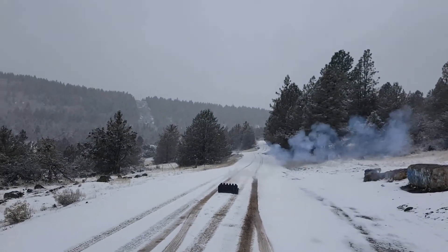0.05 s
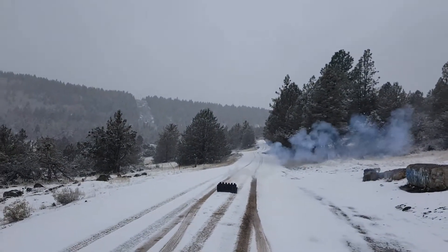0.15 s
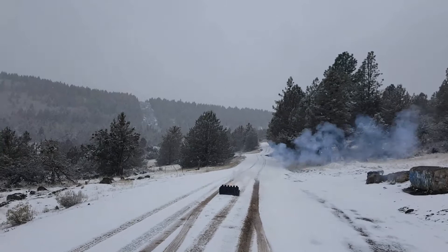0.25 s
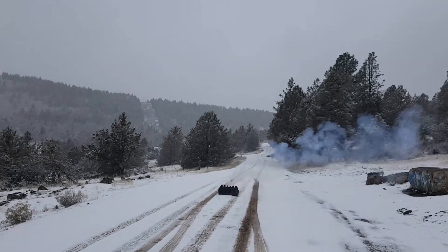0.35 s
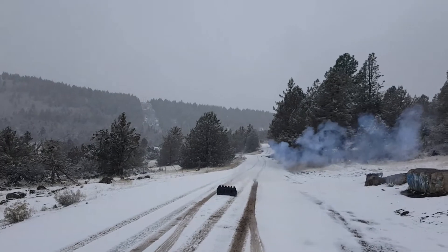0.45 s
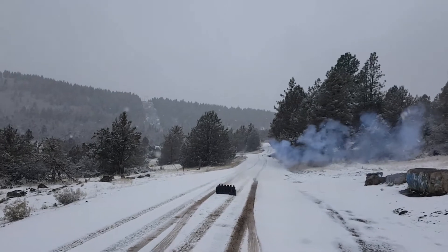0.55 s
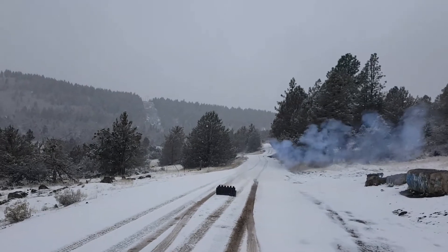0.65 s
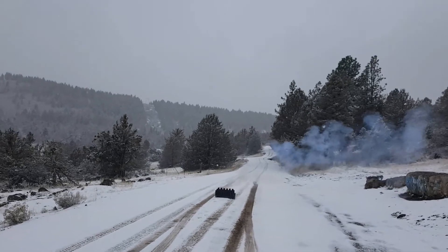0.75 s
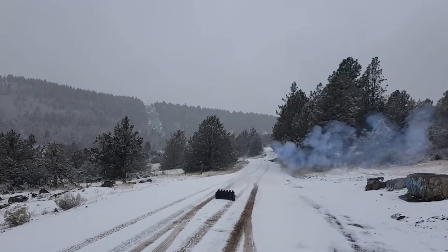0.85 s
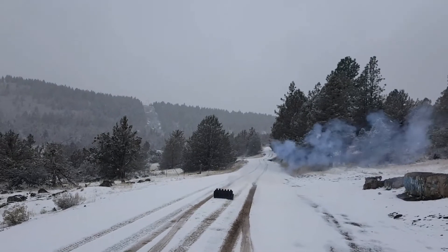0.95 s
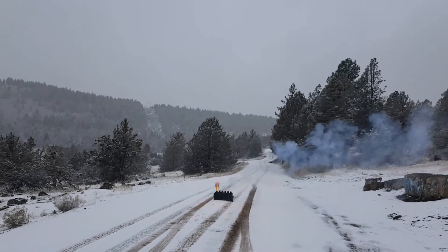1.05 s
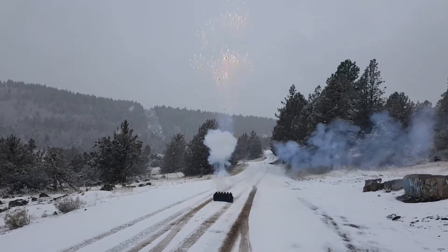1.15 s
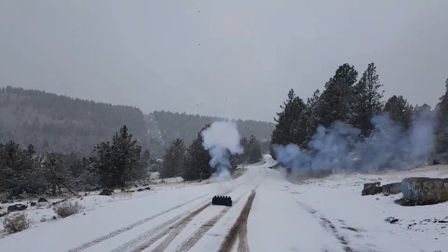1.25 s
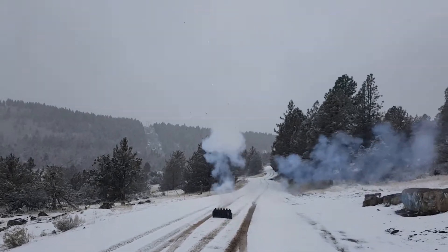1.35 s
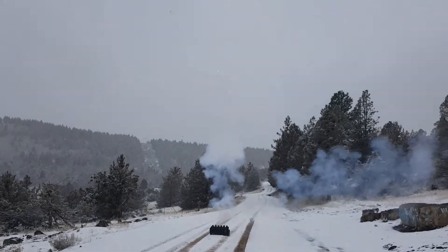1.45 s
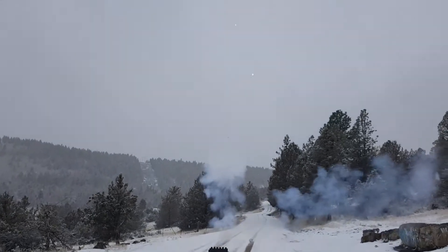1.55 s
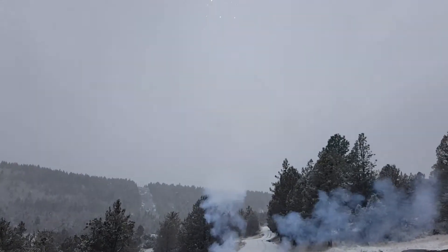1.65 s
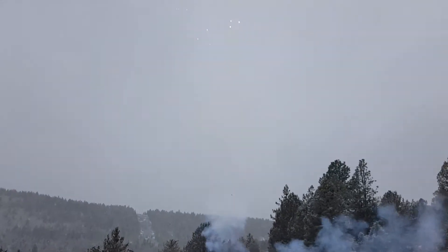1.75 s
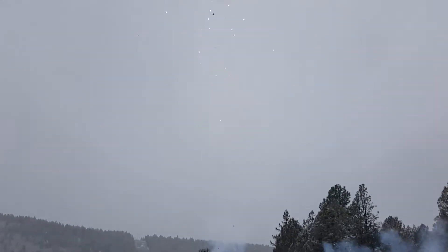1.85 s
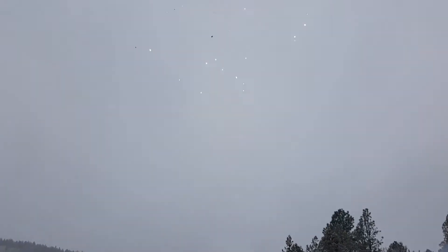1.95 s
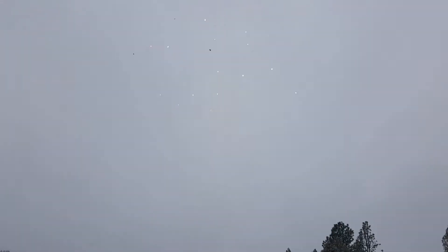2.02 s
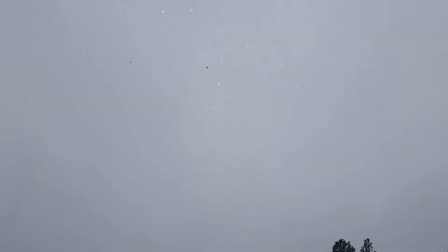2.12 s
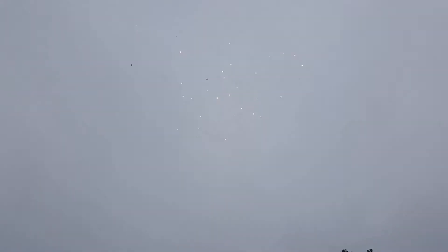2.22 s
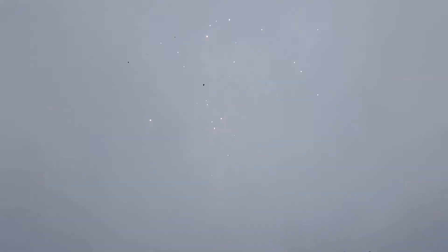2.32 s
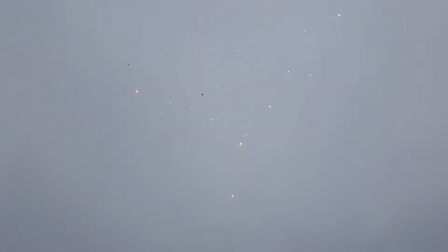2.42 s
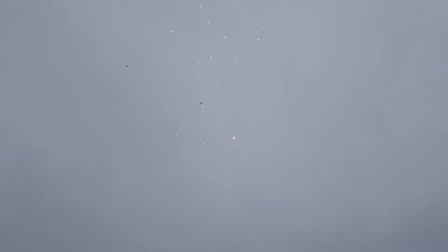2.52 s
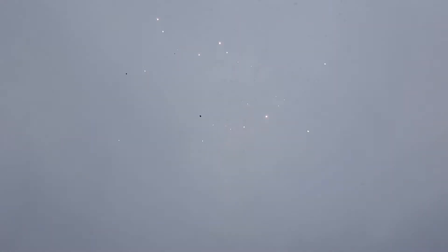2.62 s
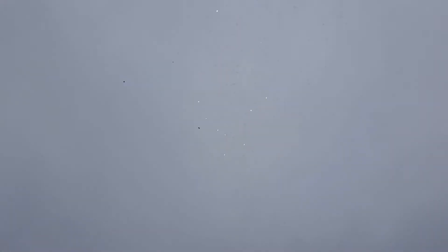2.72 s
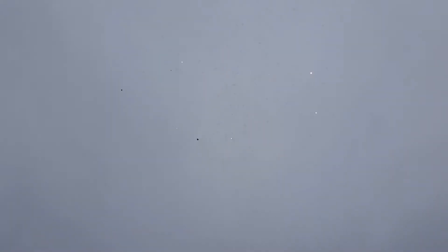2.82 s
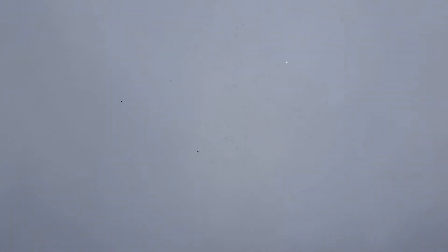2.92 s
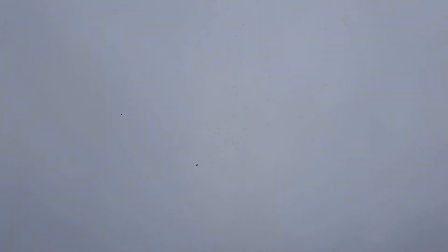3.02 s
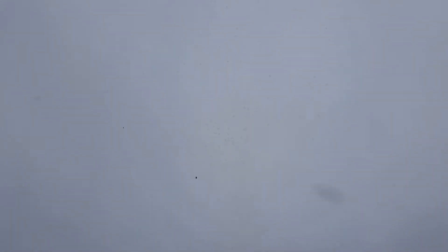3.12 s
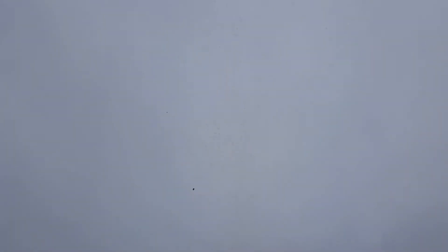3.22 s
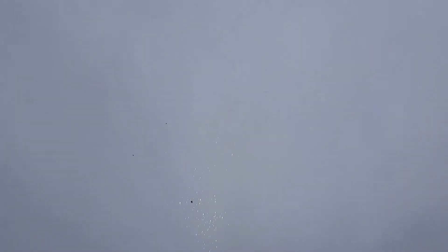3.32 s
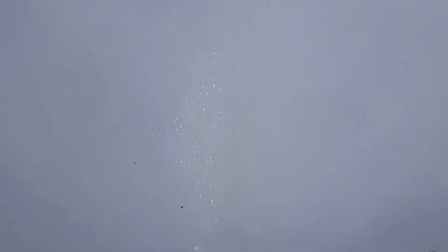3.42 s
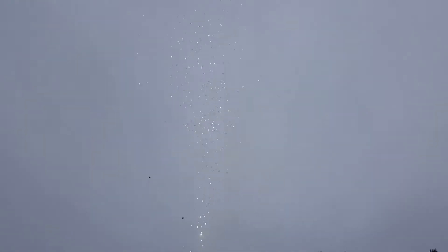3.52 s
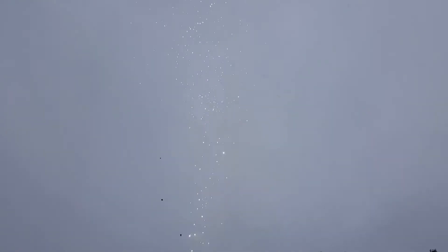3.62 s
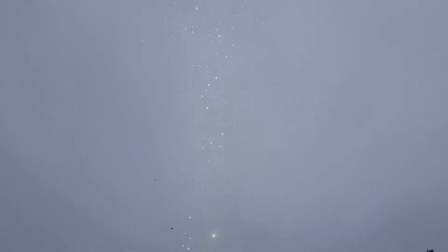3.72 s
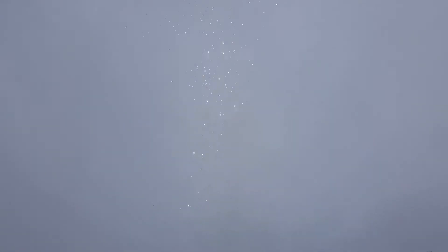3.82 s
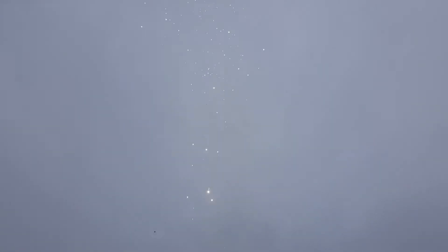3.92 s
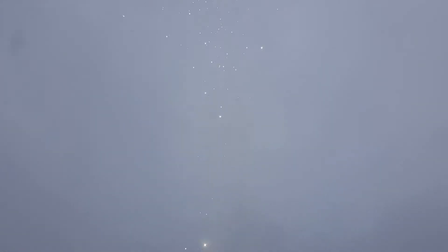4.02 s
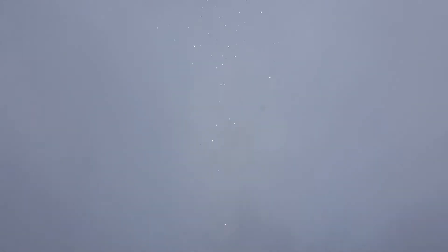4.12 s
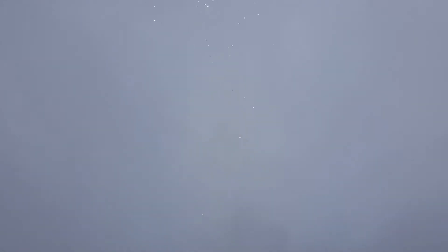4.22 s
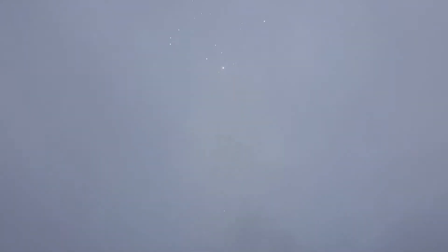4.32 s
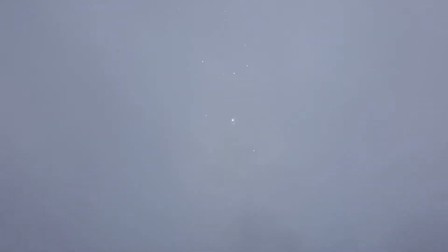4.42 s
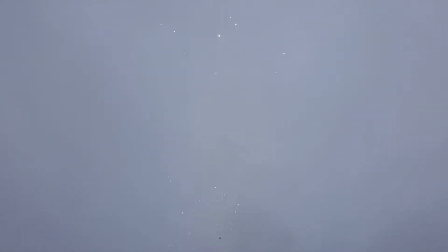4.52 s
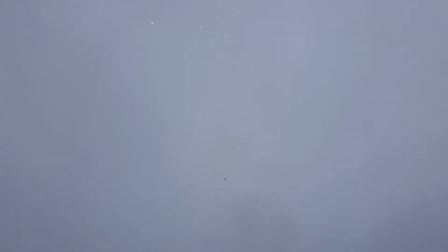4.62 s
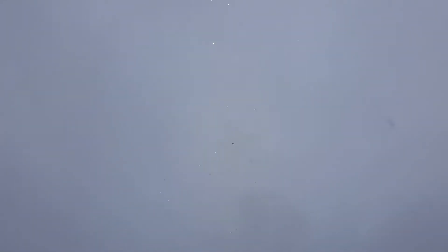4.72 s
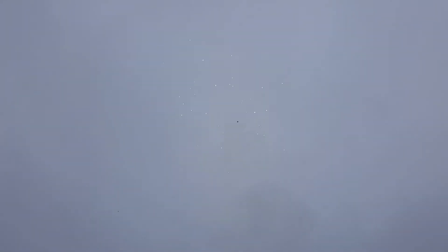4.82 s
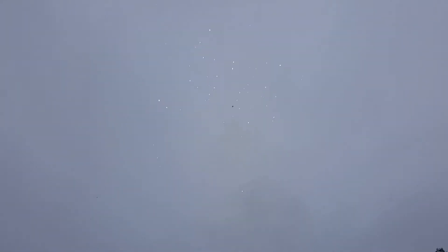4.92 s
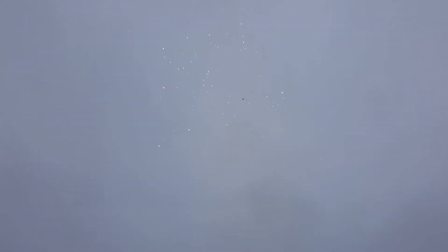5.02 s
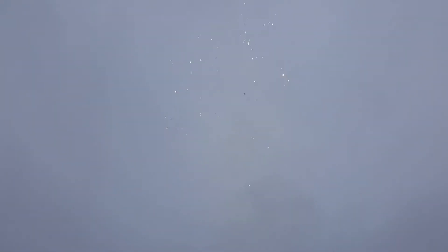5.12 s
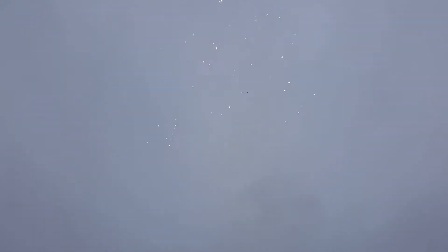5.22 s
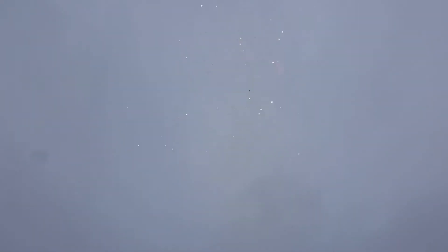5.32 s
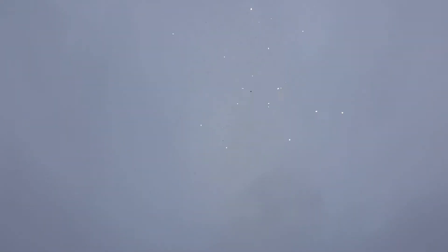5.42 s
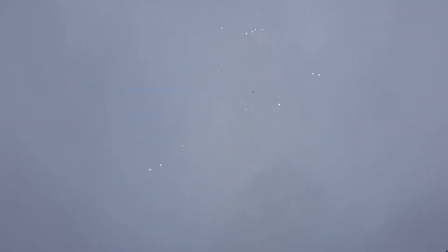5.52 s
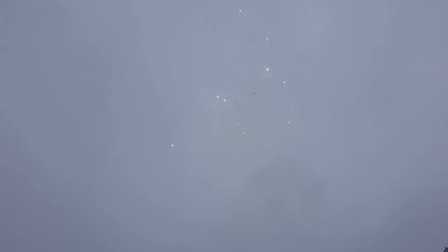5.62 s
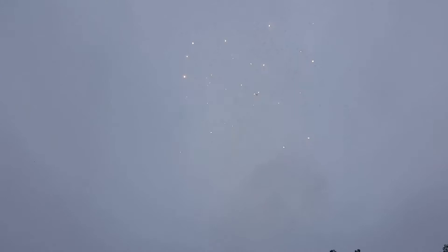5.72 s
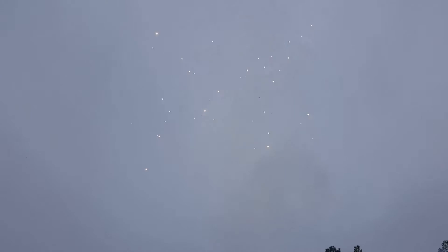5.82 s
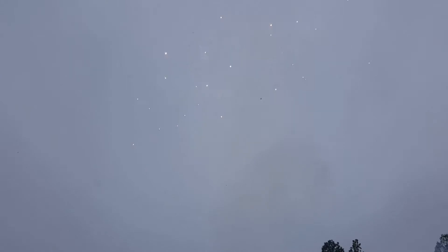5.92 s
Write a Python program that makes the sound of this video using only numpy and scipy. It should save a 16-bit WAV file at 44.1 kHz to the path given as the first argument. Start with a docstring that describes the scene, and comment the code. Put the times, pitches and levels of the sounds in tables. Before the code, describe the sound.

A quiet open-air bed of rumble and swelling fine hiss, with little dull pops. Three launches crack out near a phone microphone: snap, tearing gas blast, hollow tube ring, low thump. Trees and slopes answer with patchy slaps and a fluttering wash. The first rolls most strongly; the second and third come closer together. Loud peaks saturate and the background ducks.

```python
"""Over a low outdoor rumble and a fine hiss that comes and goes, small dull pops sound before, between and
after the shots. Three firework mines fire in turn from a rack on a snowy road, some metres from a phone.
Each shot is an ignition snap, a tearing muzzle blast with ringing tubes and low swings of the gas cloud;
hissing stars follow, and trees, banks and hills roll the sound back. All but the pure swings and
echo thumps start as coloured noise; pops add damped tones. The phone ducks and saturates on loud sound."""
import sys
import numpy as np
from scipy import signal
from scipy.fft import rfft, irfft
from scipy.io import wavfile
from scipy.ndimage import uniform_filter1d, minimum_filter1d

SR = 44100
rng = np.random.default_rng(int(sys.argv[2]) if len(sys.argv) > 2 else 0)


def persist_wave(psi):
    """Save psi, clipped to +-1, as 16-bit WAV."""
    counts = np.round(np.clip(psi, -1, 1) * 32767).astype(np.int16)
    wavfile.write(sys.argv[1], SR, np.atleast_2d(counts).T)


N = 262836
TOP_HZ = 15850  # upper band limit
BLAST_S = 0.01  # time from blast onset to its collapse
HILL_DELAY_S = 0.25

# All spectra give relative density per Hz, since noise() brings its result to rms 1.
# Stereo image of near sounds: hz, side_minus_mid_db, left_minus_right_db
NEAR_WIDTH = [(60, -8.5, 0.5), (160, -14.5, -1.5), (450, -8, 0.5), (993, -2, 0), (2120, 1.5, 4),
              (4000, -3, 0.5), (8500, 1.5, -4), (12950, -0.5, 0)]
# Stereo image of distant sounds: hz, side_minus_mid_db, left_minus_right_db
FAR_WIDTH = [(60, -18, -0.5), (200, -15.5, -2), (400, -9.5, -1.5), (900, -1, -1), (1480, 0.5, 5.5),
             (2310, -4, 6.5), (4400, -2, -1.5), (8300, 0.5, 2), (12600, -3.5, 10)]


def undb(db):
    """Amplitude ratio: 20 dB is a factor of ten."""
    return 10 ** (np.asarray(db) / 20)


def on_log(hz, points):
    """Logarithmic pitch scale: join rows (hz, value, ..) linearly over log frequency, a curve per column."""
    f, *columns = np.transpose(points)
    log_hz = np.log(np.maximum(hz, 1))
    return [np.interp(log_hz, np.log(f), column) for column in columns]


def pan(db):
    """Level-difference stereo: left and right gains split the difference equally."""
    return undb(np.vstack([db, -db]) / 2)


def noise(spectrum, image, size, tilt_db=0):
    """Spectral shaping: white mid and side noise is filtered to a colour and image, with rms 1."""
    hz = np.fft.rfftfreq(size, 1 / SR)
    side_db, pan_db = on_log(hz, image)
    colour_db, = on_log(hz, spectrum)
    mid, side = rfft(rng.standard_normal((2, size)))
    side = side * undb(side_db)
    # the tilt approaches tilt_db per octave well above 1 kHz
    colour_db = colour_db + tilt_db * np.log2(1 + hz / 1000)
    gain = undb(colour_db) * (hz > 10) * (hz < TOP_HZ)
    x = irfft(np.array([mid + side, mid - side]) * gain * pan(pan_db), size)
    return x / x.std()


def walk(rate, size):
    """Random modulation: straight lines join normal random knots, rate per second."""
    knots = rng.standard_normal(4096)
    return np.interp(np.arange(size) / SR * rate, np.arange(len(knots)), knots)


def fade(t, rise, t60):
    """Exponential relaxation: silence before zero, then a rise and a 60 dB decay in t60 seconds."""
    t = np.maximum(t, 0)
    return (1 - np.exp(-t / rise)) * np.exp(-np.log(1000) * t / t60)


def add(out, start, x):
    """Linear superposition: mix a sound in at a time in seconds."""
    i = int(start * SR)
    out[:, i:i + x.shape[-1]] += x[..., :N - i]


def shots():
    """Superposition: each shot sums its near sources and the delayed answer of the land."""
    # The three shots; levels are relative, before offsets in the sources and the common gain:
    # start_s, snap_db, blast_delay_s, blast_db, blast_tilt_db_per_octave, jet_rise_s, roll_db,
    # boom_hz, boom_db, overtone_db, forest_db, far_returns_db, ground_bounce_share, stars_db
    firings = [(1.1416, -13.5, .0071, -1.5, -0.5, .002, 5, 123, 1, 6, 0.5, 2.5, 0.43, -41.5),
               (3.2775, -10, .0046, -0.5, -1.3, 0.0053, -7.5, 104, -3, -3.5, -3, -3.5, 0.061, -39.5),
               (4.4684, -22.5, .0074, -7.5, -2.5, 0.0021, 0, 107.4, -1, -8, -2.5, -4.5, .15, -39)]
    forest_base_db, hill_base_db, common_db = -28, -43, 8
    out = np.zeros((2, N))
    t = np.arange(2 ** 16) / SR
    for (start, snap_db, delay, blast_db, tilt_db, jet_rise, roll_db,
         boom_hz, boom_db, overtone_db, forest_db, far_db, hollow, stars_db) in firings:
        age = t - delay  # time since the blast began
        snap = undb(snap_db) * ignition_snap(t)
        blast = undb(blast_db) * muzzle_blast(age, tilt_db)
        jet = gas_jet(age - BLAST_S, jet_rise)
        cloud = undb(boom_db) * boom(age - 0.004, boom_hz, overtone_db)
        roll = undb(roll_db) * low_roll(age - BLAST_S)
        stars = undb(stars_db) * star_hiss(age)
        add(out, start, ring(snap + blast + jet) + cloud + roll + stars)

        trees = undb(forest_base_db + forest_db) * forest(t)
        slopes = undb(hill_base_db + far_db) * hills(t, hollow)
        add(out, start + delay, trees + echoes(t, far_db) + slopes)
    return undb(common_db) * out


def ignition_snap(t):
    """Impulsive source: the lift charge gives a broadband burst with a sub-millisecond rise."""
    # Colour of the ignition: hz, level_db
    snap_spectrum = [(30, -3), (150, 7.5), (500, 5.5), (1000, -7.5), (2300, 2.5), (4000, -20.5),
                     (8000, -33), (16000, -40.5)]
    return undb(2) * noise(snap_spectrum, NEAR_WIDTH, size=len(t)) * fade(t, 0.00081, 0.099)


def muzzle_blast(age, tilt_db):
    """Sudden discharge: noise holds while the charge leaves the tube, then collapses."""
    # Colour of the blast before its tilt: hz, level_db
    blast_spectrum = [(25, -3.5), (100, 2), (300, -4.5), (750, -9), (1400, -7), (2200, -8), (4000, -10),
                      (5800, -12.5), (8000, -20.5), (11500, -19.5), (16000, -16.5)]
    collapse = np.exp(-np.maximum(age - BLAST_S, 0) / 0.00088)
    hold = fade(age, 0.0014, 0.93) * collapse
    return noise(blast_spectrum, NEAR_WIDTH, size=len(age), tilt_db=tilt_db) * hold


def gas_jet(age, rise):
    """Turbulent jet noise: random modulation makes the escaping gas tear unevenly as it fades."""
    # Colour of the jet: hz, level_db
    jet_spectrum = [(25, -7.5), (120, 6), (300, 0.5), (500, 0), (850, -18.5), (1400, -11.5), (2400, -13),
                    (4000, -10.5), (7500, -20.5), (11000, -22), (16000, -24)]
    tearing = undb(2.9 * walk(300, size=len(age)))
    gas = noise(jet_spectrum, NEAR_WIDTH, size=len(age)) * tearing
    return undb(-14.5) * gas * fade(age, rise, 0.18)


def ring(x):
    """Modal resonance: the near sound excites parallel peaks of the tubes and their rack."""
    # Modes of the tubes and rack: centre_hz, width_hz, level_db
    tube_modes = [(410, 39, -3.5), (570, 72, -2), (707, 34, -2), (1080, 110, 0.5), (1250, 13, 1),
                  (1390, 35, -9), (1600, 240, -5.5), (1760, 27, -1), (2060, 59, -4), (2260, 60, -5.5),
                  (2510, 55, -9.5), (2526, 51, -3), (2870, 43, -7.5), (3500, 40, -11.5)]
    out = x
    for hz, width, db in tube_modes:
        b, a = signal.iirpeak(hz, hz / width, fs=SR)
        out = out + undb(db) * signal.lfilter(b, a, x)
    return out


def boom(t, pitch_hz, overtone_db):
    """Inertia against elastic pressure: the gas cloud swells and rebounds for a few cycles."""
    # Further swings of the gas cloud: pitch_hz, level_db, crest_s, share_of_overtone_db
    further_swings = [(46, -26, 0.0089, 2.7), (165.2, -9, 0.019, 0), (238.4, -10.5, 0.016, 1),
                      (421.5, -26.5, .026, 0)]
    main_swing = (pitch_hz, -5, 0.017, 0)  # same columns
    t = np.maximum(t, 0)
    ports = np.array([[0], [.00025]])  # phase offset in seconds between the two microphones
    out = 0
    for hz, db, crest, share in [main_swing] + further_swings:
        swell = (t / crest * np.exp(1 - t / crest)) ** 2
        swing = np.sin(2 * np.pi * hz * (t + ports))
        out = out + undb(db + share * overtone_db) * swell * swing
    return out * pan(-1.2)


def low_roll(age):
    """Exponential decay: low-frequency noise rolls on after the blast collapses."""
    # Colour of the roll: hz, level_db
    roll_spectrum = [(25, -24), (70, -8), (110, 0.5), (165, 4.5), (270, -1.5), (340, -18.5), (450, -13),
                     (800, -41), (2000, -50)]
    return undb(-11) * noise(roll_spectrum, NEAR_WIDTH, size=len(age)) * fade(age, 0.03, 0.34)


def star_hiss(age):
    """Combustion noise: burning stars hiss more faintly the higher they climb, as a decay."""
    # Colour of the star hiss: hz, level_db
    star_spectrum = [(1500, -12.5), (3800, 7.5), (5500, -0.5), (7700, -3), (11000, 2), (14000, 0),
                     (16000, -4.5)]
    return noise(star_spectrum, FAR_WIDTH, size=len(age)) * fade(age, 0.015, 1.147)


def forest(t):
    """Multiple scattering: countless trunks return the shot as noise in uneven patches."""
    # Colour of the scattered sound: hz, level_db
    forest_spectrum = [(25, -12.5), (70, 5), (130, 19), (190, 6), (320, -12.5), (700, -9), (1200, -7),
                       (2100, -5), (3500, -10), (7000, -26.5), (16000, -46)]
    patches = undb(4.5 * walk(160, size=len(t)))
    return noise(forest_spectrum, FAR_WIDTH, size=len(t)) * patches * fade(t, 0.02, 1.0)


def echoes(t, far_db):
    """Discrete reflection: each path delay brings a noise slap and a low decaying thump."""
    # Banks and tree groups, levels before path and thump gains: delay_s, slap_db, slap_length_s, thump_db
    reflectors = [(0.023, -22, .008, -31.5), (0.033, -14, 0.00524, -33), (.057, -31, 0.0063, -26),
                  (0.072, -34, 0.0053, -21), (0.083, -43, 0.0045, -30.5), (.104, -38.5, 0.0035, -42),
                  (0.153, -36, 0.023, -31.5), (.192, -32.5, .007, -31), (.2865, -30, 0.0027, -34),
                  (0.324, -32, 0.0045, -33.5), (0.349, -46.5, 0.0091, -37.5)]
    # Colour of the slaps: hz, level_db
    echo_spectrum = [(40, -10), (150, 7), (330, -5), (600, 0.5), (900, 0), (1700, 3.5), (3000, -9.5),
                     (6000, -27.5), (16000, -41)]
    out, size = np.zeros((2, len(t))), 2 ** 13
    t = t[:size]
    for delay, slap_db, length, thump_db in reflectors:
        rise = 1 - np.exp(-t / (length / 4))
        hold = rise * np.exp(-np.maximum(t - length, 0) / 0.0036)
        slap = noise(echo_spectrum, NEAR_WIDTH, size=size) * hold
        thump_hz = 125 * np.exp(0.2 * rng.standard_normal())
        thump = np.sin(2 * np.pi * thump_hz * t) * fade(t, 0.0064, 0.06)
        carry = undb(far_db * delay / HILL_DELAY_S)  # shots differ most on the long paths
        add(out, delay, carry * (undb(slap_db) * slap + undb(thump_db + 13.5) * thump))
    return out


def hills(t, hollow):
    """Diffuse reverberation: wooded slopes return a fluttering wash, hollow from its ground bounce."""
    # Colour of the hill wash: hz, level_db
    hill_spectrum = [(40, -13), (95, 21), (170, 8.5), (320, -17), (700, 0.5), (1050, 3), (2200, 2),
                     (3200, -11.5), (6000, -40), (16000, -67)]
    wash = bounce(noise(hill_spectrum, FAR_WIDTH, size=len(t)), 1074, share=hollow)
    flutter = undb(3 * walk(130, size=len(t)))
    return wash * flutter * fade(t - HILL_DELAY_S, 0.038, 2)  # 60 dB decay in 2 s


def bounce(x, hz, share):
    """Comb interference: a copy about 1 / hz later strengthens multiples of hz."""
    late = np.pad(x, ((0, 0), (int(SR / hz), 0)))[:, :x.shape[1]]
    return (x + share * late) / np.hypot(1, share)


def pops():
    """Damped oscillation: each pop is a few dying cycles with a soft noise rustle around their pitch."""
    # Small dull pops, relative level before the common gain: start_s, level_db, pitch_hz
    dull_pops = [(0.419, -29.5, 1050), (.527, -31, 555), (.839, -28, 448), (2.107, -30.5, 560),
                 (2.206, -27, 340), (2.222, -33, 530), (2.896, -33.5, 604), (2.931, -28.5, 606),
                 (2.952, -32, 710), (3.006, -37, 670), (3.081, -28, 685), (3.116, -30, 565),
                 (4.051, -31, 653), (5.245, -39, 596)]
    out, size = np.zeros((2, N)), 2 ** 12
    t = np.arange(size) / SR
    # thirty fainter pops fall at random between the first two shots
    faint = []
    for _ in range(30):
        start = rng.uniform(1.85, 2.65)
        hz = 1030 * 2 ** (0.1 * rng.standard_normal())  # spread of a tenth of an octave
        faint.append((start, -42, hz))
    for start, db, hz in dull_pops + faint:
        body = np.sin(2 * np.pi * hz * t) * fade(t, 0.0007, 0.012)
        colour = [(hz / 4, -8), (hz, 0), (2 * hz, -9), (8 * hz, -36)]  # hz, level_db
        rustle = noise(colour, FAR_WIDTH, size=size) * fade(t, 0.00075, 0.023)
        add(out, start, undb(db + 5) * (body + undb(-11) * rustle))
    return out


def outdoors():
    """Incoherent addition: low rumble, rushing middle and fine hiss; the hiss swells, at times the rush too."""
    # Swells of the hiss; the rush rises only where air_db nears or passes its floor:
    # start_s, length_s, rise_s, fizz_db, fizz_tilt_db_per_octave, air_db
    swells = [(0, 0.28, 0.022, -64, 12, -90), (.43, 0.87, 0.023, -56.5, -1, -82),
              (1.849, 1.02, 0.41, -56.5, -1.5, -55), (3.43, 1.42, 0.033, -58, 4, -48),
              (5.002, 0.75, 0.143, -64, 10, -68.5), (5.6, .4, 0.25, -57.5, 4, -56.5)]
    # Colour of the low rumble: hz, level_db
    rumble_spectrum = [(20, -27.5), (38, -7), (70, -1), (150, -1), (300, -11.5), (600, -16), (1200, -33),
                       (4000, -46.5)]
    # Colour of the rushing middle: hz, level_db
    air_spectrum = [(200, -12), (600, -3.5), (1050, 0.5), (1450, -1.5), (1950, 0), (2250, 2.5), (2700, -6),
                    (3800, -8), (5000, -16), (8000, -21), (16000, -39)]
    # Colour of the fine hiss: hz, level_db
    fizz_spectrum = [(1500, -10), (3500, 6), (5500, -8), (7700, -5), (10000, 4), (12000, 3.5), (14000, -3),
                     (16000, -4)]
    rumble_db, air_floor_db, fizz_floor_db = -44.5, -56, -70.5
    scene_t = np.arange(N) / SR
    air_gain = undb(air_floor_db)
    fizz = undb(fizz_floor_db) * noise(fizz_spectrum, FAR_WIDTH, size=N)
    t = np.arange(2 ** 16) / SR
    for start, length, rise, fizz_db, tilt_db, air_db in swells:
        swell = np.minimum(t / rise, 1) * np.exp(-np.maximum(t - length, 0) / 0.026)
        # independent powers add
        air_gain = np.hypot(air_gain, undb(air_db) * np.interp(scene_t - start, t, swell))
        hiss = noise(fizz_spectrum, FAR_WIDTH, size=len(t), tilt_db=tilt_db)
        add(fizz, start, undb(fizz_db) * swell * hiss)
    rumble_gain = undb(rumble_db + 1.6 * walk(7, size=N))
    rumble = noise(rumble_spectrum, FAR_WIDTH, size=N) * rumble_gain
    air = noise(air_spectrum, FAR_WIDTH, size=N) * air_gain * undb(0.59 * walk(30, size=N))
    return rumble + air + fizz * undb(1.1 * walk(170, size=N))


def gain_control(x):
    """Dynamic compression: gain drops at once on a loud sound, stays down, then recovers."""
    threshold, depth_db = 0.2, 9  # amplitude where it acts, deepest cut
    hold_s, release_s = 0.27, 0.73  # hold and averaging windows
    hold, release = int(hold_s * SR), int(release_s * SR)
    over = np.maximum(np.abs(x).max(axis=0) / threshold, 1)
    cut_db = np.maximum(-20 * np.log10(over), -depth_db)
    # the origins make both windows look back in time
    held = minimum_filter1d(cut_db, hold, origin=(hold - 1) // 2, mode="nearest")
    eased = uniform_filter1d(held, release, origin=(release - 1) // 2, mode="nearest")
    return x * undb(np.minimum(held, eased))


def scene():
    """Superposition: everything that reaches the phone."""
    return shots() + pops() + outdoors()


def record(dry):
    """Nonlinear saturation: the phone ducks, rounds off peaks near full scale and cuts the top."""
    knee, ceiling = 5, 1.0  # sharpness of the bend, limiting amplitude
    x = gain_control(dry)
    clipped = x / (1 + np.abs(x / ceiling) ** knee) ** (1 / knee)
    top_cut = signal.ellip(12, 0.2, 80, TOP_HZ, fs=SR, output="sos")
    return signal.sosfilt(top_cut, clipped)


dry = scene()
out = record(dry)
persist_wave(out)
```